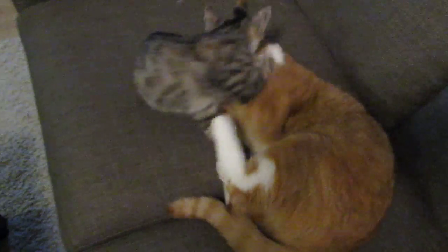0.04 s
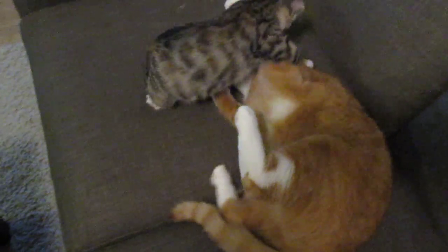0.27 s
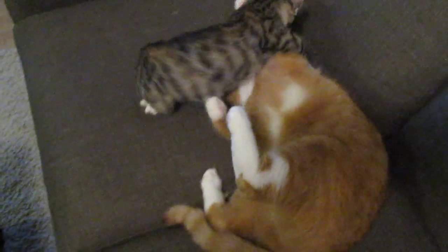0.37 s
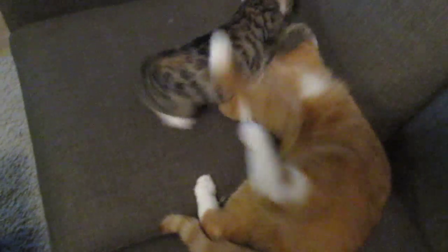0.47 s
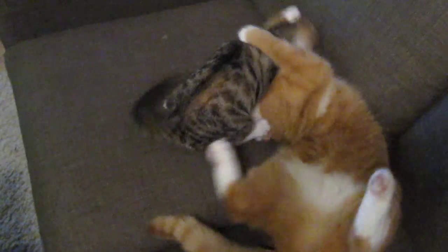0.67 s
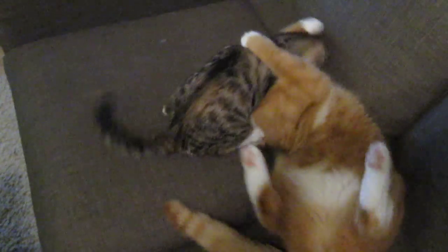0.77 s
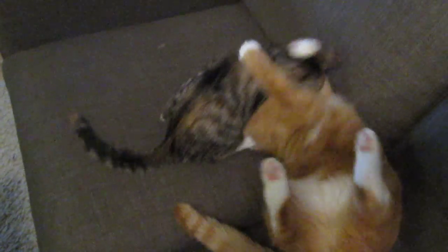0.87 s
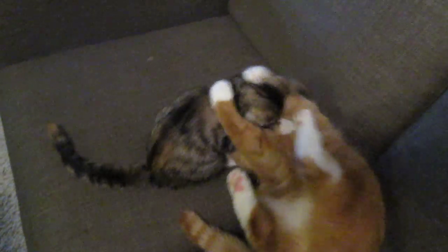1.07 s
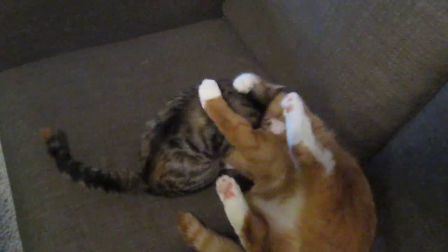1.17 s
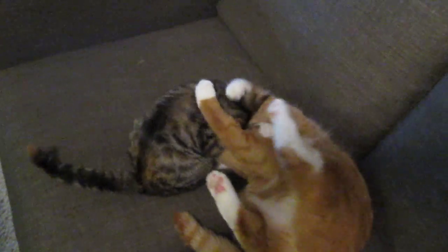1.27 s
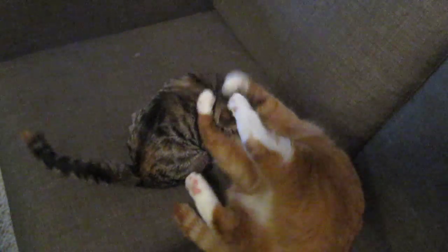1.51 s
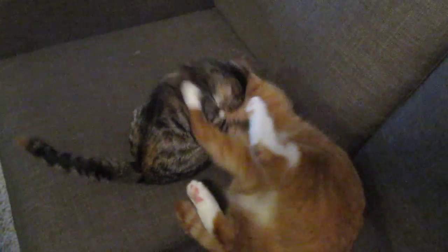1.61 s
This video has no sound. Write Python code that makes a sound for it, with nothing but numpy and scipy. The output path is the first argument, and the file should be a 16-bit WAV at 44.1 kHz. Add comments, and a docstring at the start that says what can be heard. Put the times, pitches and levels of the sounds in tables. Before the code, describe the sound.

Close indoor sound of cats play-fighting, with dry paw swats clustering early, soft cushion thuds and slight fur rustle, a barely audible later swat, and constant electrical hum and airy hiss behind.

```python
"""Two cats wrestle on a fabric sofa in a living room.
Paw swats come in quick bursts, then one faint late swat: damped slaps with claw ticks and a sofa ring.
The swats echo in the room; decaying low sines thud in the cushion and grainy noise brushes as fur on cloth.
Behind, an electric appliance hums with wavering sines and hisses with nearly steady coloured noise."""
import sys
import numpy as np
from scipy import signal
from scipy.fft import rfft, irfft
from scipy.io import wavfile

SR = 44100
rng = np.random.default_rng(int(sys.argv[2]) if len(sys.argv) > 2 else 0)


def bounce(signal):
    """Save signal as a 16-bit WAV file at the path given by the first command-line argument."""
    frames = np.transpose(np.atleast_2d(signal))
    limited = np.clip(frames, -1, 1)
    pcm = np.round(limited * 32767).astype(np.int16)
    wavfile.write(sys.argv[1], SR, pcm)


N = 72765
T = np.arange(N) / SR
FREQS = np.maximum(np.fft.rfftfreq(N, 1 / SR), 1)


def from_db(db):
    """Decibels to amplitude gain."""
    return 10 ** (np.asarray(db) / 20)


def rms_one(x):
    """Scale to unit rms."""
    return x / np.sqrt(np.mean(x ** 2) + 1e-20)


def at_hz(points, hz):
    """Interpolate a table on a log-frequency axis."""
    f_hz, value = np.transpose(points)
    return np.interp(np.log(hz), np.log(f_hz), value)


def noise(spectrum):
    """Unit-rms Gaussian noise shaped to a spectrum table."""
    white = rfft(rng.standard_normal(N))
    return rms_one(irfft(white * from_db(at_hz(spectrum, FREQS)), N))


def drift(corner_hz):
    """Unit-rms random wander, low-passed above the corner."""
    white = rfft(rng.standard_normal(N))
    return rms_one(irfft(white / (1 + (FREQS / corner_hz) ** 2), N))


def band(x, low_hz, high_hz, order=2):
    """Causal Butterworth band-pass."""
    sos = signal.butter(order, [low_hz, min(high_hz, .45 * SR)], "band", fs=SR, output="sos")
    return signal.sosfilt(sos, x)


def delayed(x, start_s):
    """Start a sound at start_s, cut to the scene length."""
    return np.concatenate([np.zeros(int(start_s * SR)), x, np.zeros(N)])[:N]


def pop(hz, octaves):
    """Impulse through a heavily damped resonance: a few swings, peak 1."""
    half_width = 2 ** (octaves / 2)
    y = band(signal.unit_impulse(N // 20), hz / half_width, hz * half_width, order=3)
    return y / np.abs(y).max()


def ring(hz, t60_s):
    """Sine that decays 60 dB in t60_s."""
    return np.sin(2 * np.pi * hz * T) * from_db(-60 * T / t60_s)


def swats():
    """A swat excites a hollow slap, a low push, an upper snap, a claw-noise tick and the sofa's modes."""
    # paw swats: t/s, level/dB, slap f/Hz, slap width/octaves,
    # then re slap: push/dB, snap/dB, tick/dB (before halving), sofa ring/dB
    swat_table = [(0.2291, -21.5, 1000, 0.87, -29, -19, -11.5, -25.5),
                  (0.2336, -13, 920, 1.2, -17, -12, -10.5, -32),
                  (0.3397, -14.5, 926, 1.26, -22, -11, -12.5, -24.5),
                  (0.4486, -14.5, 923, 0.82, -40, -27, -4.5, -19.5),
                  (0.4545, -26.5, 960, .9, -21, -25, 4.5, -13), (0.4568, -28, 940, 0.95, -27, -24, -4, -33),
                  (0.4614, -35.5, 1120, 0.65, -18, -21, -2, -5),
                  (0.4652, -17.5, 840, 1.17, -25.5, -12.5, -8, -21.5),
                  (0.4678, -28, 960, 1.53, -39, -34, 5, -18), (0.8178, -36.5, 650, 1.74, -4, -9, 0, -21)]
    # modes of the struck sofa: f/Hz, level/dB, t60/s
    sofa_modes = [(519, -5, 0.13), (650, -1, 0.15), (777.5, -0.5, 0.16), (839.5, 3, 0.075), (916, -4, .14),
                  (1120, -25, 0.36), (1345, -7, 0.25), (1660, -15.5, 0.43)]
    # claws on cloth, relative spectrum: f/Hz, level/dB per Hz
    tick_spectrum = [(300, -13), (1500, -1.5), (3200, 12), (4100, 4.5), (5400, 9), (7500, -1.5),
                     (11500, -1.5), (16000, -8.5)]
    tick_decay_s = 0.00086

    sofa = sum(from_db(db) * ring(hz, t60_s) for hz, db, t60_s in sofa_modes)
    push = pop(hz=344, octaves=1.45)  # soft pad
    snap = pop(hz=2493, octaves=0.4)
    out = np.zeros(N)
    for start_s, db, hz, octaves, push_db, snap_db, tick_db, ring_db in swat_table:
        tick = .5 * noise(tick_spectrum) * np.exp(-T / tick_decay_s)
        slap = pop(hz, octaves) + from_db(push_db) * push + from_db(snap_db) * snap
        tick_and_ring = from_db(tick_db) * tick + from_db(ring_db) * sofa
        out += from_db(db) * (delayed(slap, start_s) + delayed(tick_and_ring, start_s))
    return out


def room(x):
    """Near surfaces give discrete echoes; a diffuse tail decays per band, longest in the bass."""
    # nearby surfaces: delay/s, level/dB
    echoes = [(.0047, -11), (.0086, -20.5)]
    # tail decay time: f/Hz, t60/s
    tail_t60 = [(100, 1), (300, 0.8), (800, 0.43), (2000, 0.35), (5000, 0.33), (14000, 0.37)]
    # tail colour: f/Hz, level/dB re tail_db
    tail_colour = [(100, -2), (300, -1.5), (750, -1), (1100, -8.5), (1650, 3), (2450, -4.5), (3500, 1),
                   (5400, 0), (14000, -4.5)]
    tail_db, build_s = -36.5, 0.0014

    edges_hz = np.geomspace(70, 18000, 9)
    tail = np.zeros(N)
    for low_hz, high_hz in zip(edges_hz, edges_hz[1:]):
        mid_hz = np.sqrt(low_hz * high_hz)
        fall_db = -60 * T / at_hz(tail_t60, mid_hz)
        level_db = tail_db + at_hz(tail_colour, mid_hz) + fall_db
        tail += band(rng.standard_normal(N), low_hz, high_hz) * from_db(level_db)
    tail *= 1 - np.exp(-T / build_s)
    near = sum(from_db(db) * delayed(x, delay_s) for delay_s, db in echoes)
    return near + signal.fftconvolve(x, tail)[:N]


def cushion():
    """Bodies landing on the seat: each thud is a low decaying sine."""
    # landings: t/s, level/dB, f/Hz
    thuds = [(0.239, -47.5, 141), (0.347, -45.5, 133.6), (0.455, -56, 123), (0.47, -52.5, 67.6),
             (0.671, -55, 148), (0.818, -62, 166), (0.882, -53.5, 64)]
    return sum(from_db(db) * delayed(ring(hz, t60_s=0.21), start_s) for start_s, db, hz in thuds)


def fur():
    """Fur sliding on cloth: grainy noise under a Gaussian swell per stroke."""
    # strokes: centre t/s, half length to 1/e /s, level/dB
    brushes = [(0.464, 0.01, -49.5), (0.683, 0.026, -55), (0.876, .05, -84)]
    # fur on cloth, relative spectrum: f/Hz, level/dB per Hz
    fur_spectrum = [(300, -1), (1000, -1), (3000, 2), (5500, 1), (8000, 2), (12000, -6), (16000, -11)]
    grain_db, grain_corner_hz = 1.5, 450

    stroke = sum(from_db(db) * np.exp(-((T - mid_s) / half_s) ** 2) for mid_s, half_s, db in brushes)
    grain = from_db(grain_db * drift(grain_corner_hz))
    return stroke * rms_one(noise(fur_spectrum) * grain)


def appliance():
    """Motor sines wander in level and phase over a rush of coloured noise."""
    # motor tones: f/Hz, level before waver/dB rms
    hum = [(658, -64.5), (1098, -56), (1757, -62), (1922, -74), (1976.5, -63), (2439, -73)]
    # rush of air, relative spectrum: f/Hz, level/dB per Hz
    air_spectrum = [(12, -29), (25, -16), (65, -12), (100, -15), (160, -13.5), (300, -12), (370, -9.5),
                    (500, -12), (670, -7), (950, -11), (1110, -11), (1450, -9), (1680, -18), (2100, -12.5),
                    (2600, -13.5), (3100, -21), (4200, -23.5), (4850, -20.5), (5600, -25.5), (7500, -25),
                    (9000, -29), (12000, -31.5), (15500, -36)]
    # air level contour: t/s, level/dB re air_db
    air_swell = [(0, -1.9), (0.2, -.5), (0.7, -0.6), (1.2, -1), (1.65, -1)]
    waver_db, waver_corner_hz, phase_wander_rad = 2, 1, 0.033
    air_db = -49

    tones = np.zeros(N)
    for hz, db in hum:
        level = from_db(db + waver_db * drift(waver_corner_hz))
        phase = 2 * np.pi * (hz * T + rng.random())
        tones += level * np.sin(phase + phase_wander_rad * drift(waver_corner_hz))
    air_level_db = air_db + np.interp(T, *np.transpose(air_swell))
    return np.sqrt(2) * tones + from_db(air_level_db) * noise(air_spectrum)  # sqrt(2): rms to peak


def scene():
    """Swats direct and through the room, plus dry thuds, fur and appliance."""
    hits = swats()
    return (hits + room(hits) + cushion() + fur() + appliance())[None]


def record(dry):
    """Steep elliptic low-pass at 16 kHz."""
    cutoff_hz = 16000
    sos = signal.ellip(12, .1, 80, cutoff_hz, fs=SR, output="sos")  # 0.1 dB ripple, 80 dB stop
    return signal.sosfilt(sos, dry)


dry = scene()
out = record(dry)
bounce(out)
```